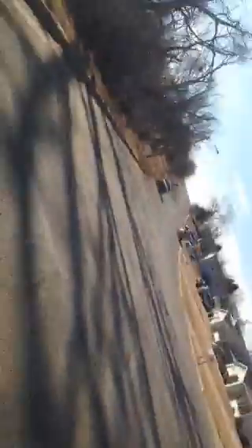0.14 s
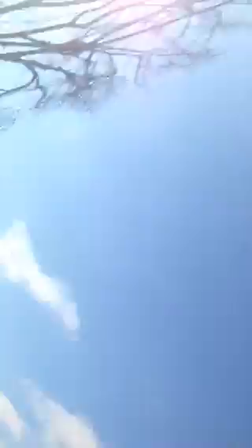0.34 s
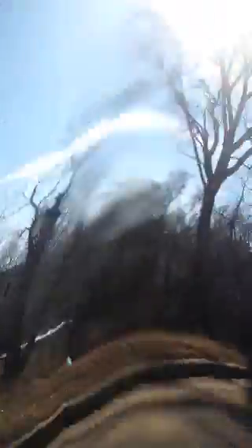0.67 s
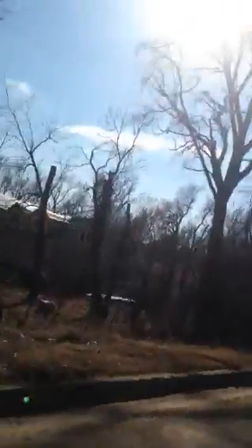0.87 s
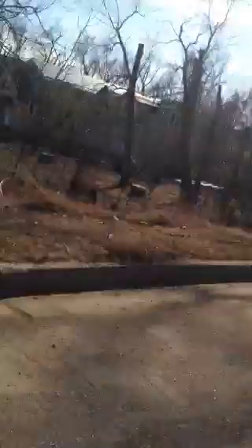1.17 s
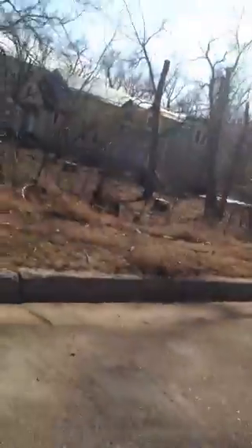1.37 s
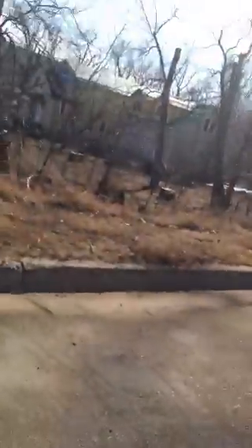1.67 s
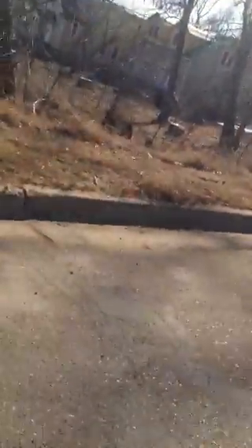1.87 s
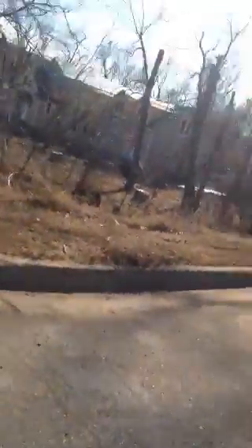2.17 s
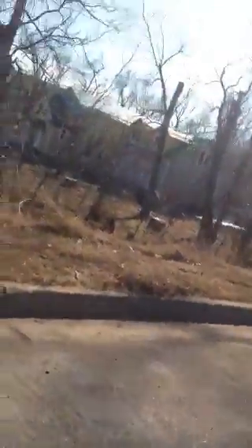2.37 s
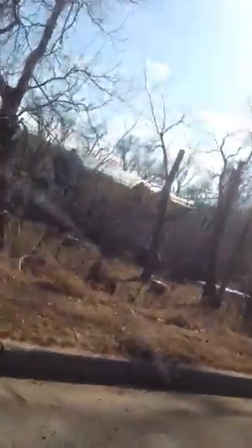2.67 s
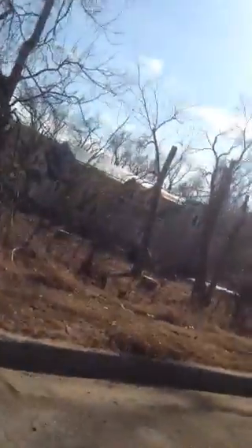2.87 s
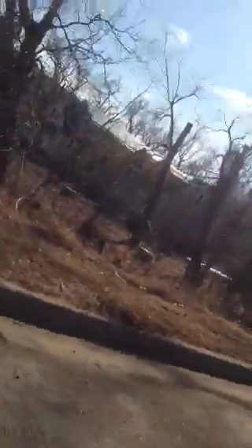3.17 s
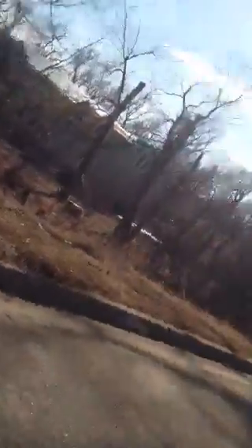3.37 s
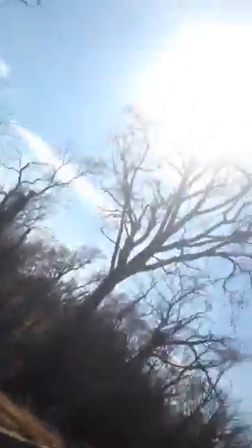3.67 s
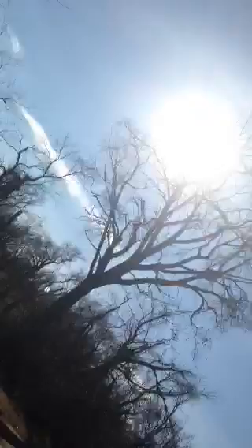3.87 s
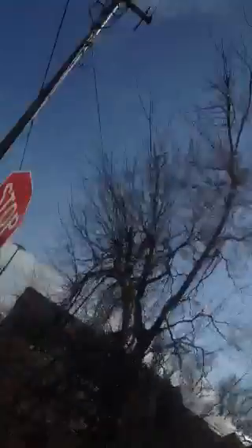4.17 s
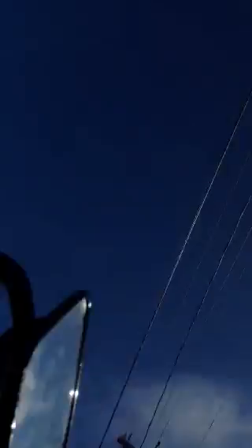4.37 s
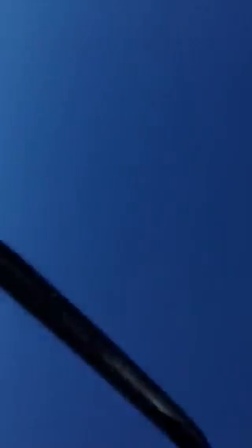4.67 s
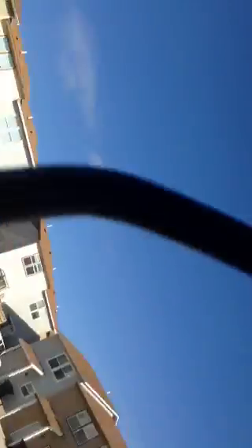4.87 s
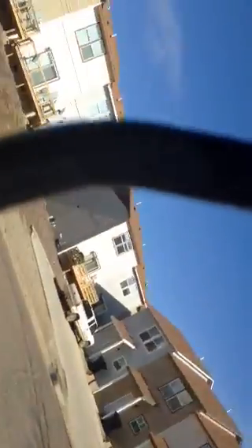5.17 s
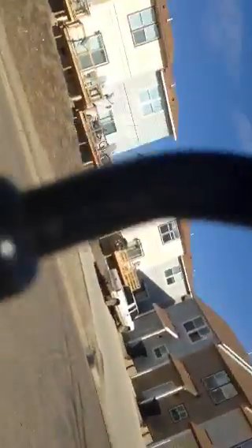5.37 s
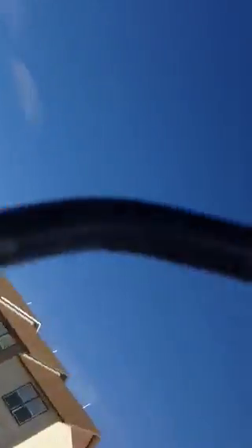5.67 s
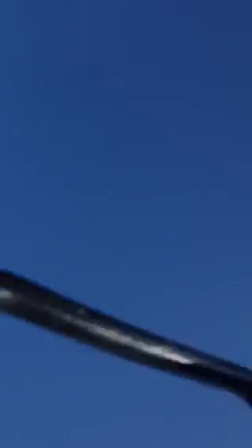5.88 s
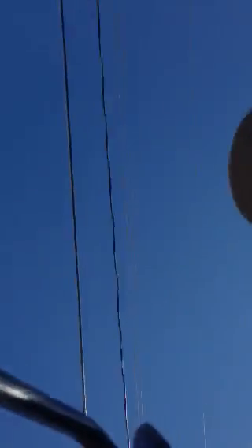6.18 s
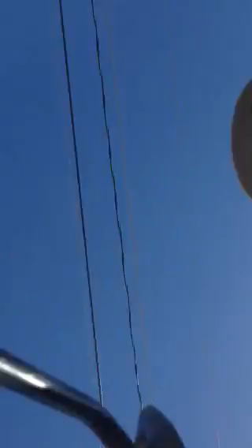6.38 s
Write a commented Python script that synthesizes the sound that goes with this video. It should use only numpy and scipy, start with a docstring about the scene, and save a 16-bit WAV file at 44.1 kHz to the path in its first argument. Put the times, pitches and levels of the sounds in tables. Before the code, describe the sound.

Close on a small motorbike outdoors, rough rubs, a short groan, thin squeaks and dull thumps come first, with low wind fading to a lull. At two seconds the single-cylinder engine catches unevenly, then climbs into a rattling, steady putter with faint chirps. Near the end a gear clanks in, the speed sags, a chain scrapes, and the engine recovers.

```python
"""Rubs, a groan and dry squeaks come first: a rider shifts about on a small single-cylinder motorbike.
Noise bursts make the rubs and clacks, wavering tones the squeaks, and damped modes the frame thumps.
Then the engine starts and runs up: each cycle rings silencer, air box and panels and shapes noise into clatter.
A loose part chirps with the engine, a gear clanks in, the speed sags and recovers, and the chain scrapes.
Filtered noise lays a quiet street underneath, with wind that dies before the start and then returns."""
import sys
import numpy as np
from scipy import signal
from scipy.fft import rfft, irfft
from scipy.io import wavfile

SR = 44100
rng = np.random.default_rng(int(sys.argv[2]) if len(sys.argv) > 2 else 0)


def wav_out(sig):
    """Save sig, one row per channel (or a flat mono array), as 16-bit PCM at SR to the path in sys.argv[1]."""
    wavfile.write(sys.argv[1], SR, np.round(np.clip(np.atleast_2d(sig).T, -1, 1) * 32767).astype(np.int16))


N = 288414
TIME = np.arange(N) / SR  # [s]

# Spectra are filter curves; levels called relative are scaled again where they are used.
# street: (frequency [Hz], relative level [dB])
STREET_TONE = [(15, -58), (25, -1), (55, -3.5), (173, 6.5), (289, -12.5), (631, -14.5), (919, -16),
               (1050, -17), (2700, -21), (5880, -24.5), (7500, -26.5), (14300, -28), (15500, -27)]
STREET_DB = -57
# wind on the microphone: (time [s], level [dB]); its spectrum: (frequency [Hz], relative level [dB])
GUSTS = [(0, -39), (1.9, -101), (2.3, -37), (3.6, -39), (4.5, -43.5), (5.3, -33.5), (6.54, -60)]
WIND_TONE = [(15, -22), (35, -9), (65, -1), (130, 0), (190, -6), (280, -15), (600, -30), (3000, -66)]

# rubs and shoves of hand, boot and kick lever:
# (time [s], rise [s], t60 [s], relative level [dB], brightness [dB per octave])
RUBS = [(0.026, 0.024, 0.12, -4, -0.7), (0.069, 0.002, 0.74, -12, -3.5), (0.099, 0.013, 0.14, -7, 1.5),
        (0.194, .006, 0.16, -15, -0.5), (0.301, 0.011, 0.57, -27.5, -8), (0.378, 0.0051, 0.24, -25, -0.4),
        (.576, 0.0028, 0.34, -26, -1.5), (0.694, 0.026, 0.31, -17.5, -3.5), (0.907, 0.034, 0.13, -29, -2.7),
        (1.919, 0.0057, 0.62, -26, -5.5), (2.005, 0.0057, 0.089, -7, -0.3),
        (2.038, 0.0019, 0.24, -17.5, -3.6), (2.094, 0.015, 0.065, -19.5, 3), (2.136, 0.0046, 0.18, -16, 1),
        (4.044, 0.0088, 0.09, -10, -2.9), (5.646, 0.015, 1, -17.5, -0.5), (5.762, 0.015, 0.056, -17.5, 1.5)]
# their spectrum: (frequency [Hz], relative level [dB])
RUB_TONE = [(20, 0), (55, -3.5), (100, 2.5), (250, 4), (500, -2), (1900, -5.5), (5300, -10), (11500, -25),
            (16000, -39)]
# faint fidgeting before the engine starts: (time [s], relative level [dB])
FIDGET = [(.95, -56), (1.85, -65)]
# sharp clacks of levers and fittings:
# (time [s], t60 [s], relative level [dB], brightness [dB per octave])
CLACKS = [(.598, 0.034, -38.5, 1.7), (.686, 0.039, -25, -3), (.772, .075, -24.5, 2.5),
          (0.84, 0.34, -41, -2.5), (0.982, 0.012, -30, -5.5), (5.022, .05, -17.5, -2.5),
          (5.042, 0.043, -27.5, 1.5), (5.668, 0.013, -20, -1)]
# their spectrum: (frequency [Hz], relative level [dB])
CLACK_TONE = [(20, -34.5), (100, 3.5), (650, -4.5), (1900, -3), (5300, -0.5), (11500, -3.5), (16000, -31)]
# bodywork resonances that colour the bumps: (frequency [Hz], width [Hz], level over the direct sound [dB])
BODYWORK = [(343, 64, -5), (545, 21, 1), (1110, 62, -1.5), (1730, 140, -3.5), (2860, 55, -7)]
# dull thumps through the frame: (time [s], level [dB])
THUMPS = [(0.698, -26.5), (0.712, -23.5), (.762, -28), (4.068, -27.5), (5.018, -57)]
# frame modes they ring: (frequency [Hz], relative level [dB], t60 [s])
FRAME = [(63.6, -39, 0.12), (90.5, 1, 0.18), (127, 12.5, 0.069), (153, -20, 0.048)]

# a hand sticks and slips on the bodywork: (time [s], length [s], mean pitch [Hz], level [dB])
GROANS = [(0.057, 0.044, 577, -20), (0.292, 0.076, 425, -30.5)]
# the loose part squeaks when jolted: (time [s], length [s], mean pitch [Hz], level [dB])
SQUEAKS = [(0.103, 0.062, 2850, -33.5), (0.212, 0.016, 2804, -33.5), (0.314, 0.013, 2890, -43),
           (0.329, 0.064, 2920, -46.5), (0.507, 0.056, 2950, -52.5), (0.632, .04, 2930, -46),
           (0.896, 0.086, 2840, -59.5), (1.08, 0.05, 2930, -65), (1.226, 0.036, 2930, -61.5),
           (1.275, 0.056, 2980, -60.5), (1.591, .07, 2950, -64), (1.919, 0.036, 2920, -49.5),
           (2.107, 0.027, 2590, -38), (2.577, 0.02, 2890, -41)]
# hard taps on the microphone case: (time [s], level before the filter [dB])
TAPS = [(0.1824, 5), (0.7603, 10.5), (5.0218, 17)]
# their spectrum: (frequency [Hz], level [dB])
TAP_TONE = [(20, -20), (150, 3), (450, 5.5), (800, -0.5), (1300, -21), (2200, -30.5), (5000, -23.5),
            (15000, -23)]

# engine speed: (time [s], rate [firings per second])
SPEED = [(2.08, 29.85), (2.14, 17.71), (2.26, 24.86), (2.54, 24.05), (3.14, 31.3), (3.6, 32.25),
         (3.9, 33.47), (4.55, 35.07), (5.4, 34.18), (5.61, 34.82), (5.78, 25.22), (6.05, 18.89),
         (6.28, 31.07), (6.54, 32.74)]
CRUISE_PER_S = 32
# how hard the engine is fed: (time [s], level [dB])
THROTTLE = [(2.08, -8), (2.2, 3), (2.5, -1), (2.7, -1), (2.85, 3), (3.0, 1), (3.35, 1), (3.55, -0.5),
            (4.3, 0.5), (4.87, 1), (5.03, -0.5), (5.4, -1.5), (5.6, 0), (5.97, -4), (6.08, 1), (6.3, -1),
            (6.54, 1)]
# exhaust beat, heavy while the engine labours, light once it spins freely: (time [s], relative level [dB])
LOAD = [(2.08, -22), (2.5, -21), (3.0, -21.5), (3.15, -29.5), (3.55, -25), (4.0, -26), (4.5, -31),
        (5.1, -38), (5.55, -29.5), (5.95, -24.5), (6.54, -21)]
# the hand carries the microphone from air box towards cylinder head: (time [s], nearness to the head [dB])
NEARNESS = [(2.08, -6), (3.2, -.5), (4.1, 0.5), (4.6, 2.5), (6.54, 4.5)]
# how each part answers: (level at cruising speed [dB], throttle [dB per dB],
# speed [dB per extra firing a second], nearness [dB per dB])
INTAKE_LAW = (-30, 0.64, 0.2, -1.04)
CLATTER_LAW = (-42.5, 1.63, -0.07, -0.02)
FINS_LAW = (-58.5, 6.5, 0.28, 3)
VALVES_LAW = (-54.5, 2.23, 0.7, .5)
# the engine fires unevenly at first, then settles to a share of that spread
SETTLE_START_S, SETTLE_END_S, SETTLED_SHARE = 3.0, 4.2, 0.45
ADVANCE_TURNS_PER_HZ = 0.027  # the spark comes earlier in the cycle as the engine speeds up

# modes of silencer and air box: (frequency [Hz], relative level [dB], t60 [s])
SILENCER = [(80, -12, .06), (135, 0, .036), (235, -11, .03)]
AIR_BOX = [(189.7, 10, 0.079)]
# firings that knock harder than the rest: (time [s], extra level [dB])
KNOCKS = [(2.16, 16.5), (2.207, 5.5), (2.251, 7.5), (2.455, 9.5), (2.54, 13.5), (2.699, 10), (3.015, 5.5),
          (3.21, 7.5), (3.274, 6.5), (3.337, 6.5), (3.37, 11), (6.282, 14.5), (6.438, 9.5)]
# resonances of crankcase and cylinder: (frequency [Hz], width [Hz], relative level [dB])
CASE = [(492, 52, 5.5), (1055, 45, 2.5), (1530, 296, 2), (1955, 146, 6), (2280, 100, 5.5), (2830, 220, -33),
        (4780, 60, -8)]
# broad mechanical clatter: (frequency [Hz], relative level [dB])
CLATTER_TONE = [(150, -18), (330, 4), (520, 10.5), (850, 5.5), (1600, 4.5), (2500, -11), (3500, -21.5),
                (5000, -13), (7000, -16), (15000, -42)]
# panel modes that hum with each firing: (frequency [Hz], relative level [dB], t60 [s])
PANELS = [(313.5, -9.5, 0.36), (466, -3.5, 0.25), (550, -14, 0.1), (619.4, 0.5, 0.12), (1071, -27, 0.15),
          (1590, -22, 0.034)]
# valve gear: (frequency [Hz], relative level [dB])
VALVE_TONE = [(1000, 6.5), (3000, 6), (5000, 3.5), (7500, -1.5), (10000, -5.5), (15000, -16)]
# how hard the engine shakes the loose part: (time [s], relative level [dB])
SHAKE = [(2.9, -67), (3.15, -48), (3.7, -45), (4.0, -51.5), (4.4, -49.5), (4.95, -51), (5.35, -68)]

# the gear going in
GEAR_S, GEAR_DB = 5.713, -25
# gearbox modes it rings: (frequency [Hz], relative level [dB], t60 [s])
GEARBOX = [(1047, -4, .09), (1100, -1, .09), (1891, 2, .09), (2396, 0, .09), (3730, -6, .08),
           (4472, -2, .09), (4766, -3, .08), (6528, -9, .08)]
# slam of the gear dogs: (frequency [Hz], level [dB])
SLAM_TONE = [(20, -23), (100, -18), (500, -14), (1900, -6.5), (5300, -9.5), (11500, -19.5), (16000, -23)]
# the drive chain scrapes as it takes up its slack
CHAIN_S, CHAIN_DB = 5.913, -20
# its spectrum: (frequency [Hz], relative level [dB])
CHAIN_TONE = [(20, -25), (500, -10), (1500, -6.5), (2300, -4.5), (3200, -6.5), (5300, -15), (11500, -33.5),
              (16000, -42)]


def amp(db):
    """Decibels to gain."""
    return 10 ** (np.asarray(db) / 20)


def evened(x):
    """Scales to rms 1."""
    return x / np.sqrt(np.mean(x ** 2) + 1e-20)


def level(rows):
    """Gain over time from a dB curve, with short fades to silence outside it."""
    s, db = np.transpose(rows)
    edge = np.interp(TIME, [s[0] - 0.02, s[0], s[-1], s[-1] + 0.05], [0, 1, 1, 0])
    return edge * amp(np.interp(TIME, s, db))


def colour(x, points):
    """Causal minimum-phase filter with the given spectrum."""
    size = 4096
    hz, db = np.transpose(points)
    grid_hz = abs(np.fft.fftfreq(size, 1 / SR)) + 1
    log_gain = np.log(amp(np.interp(np.log(grid_hz), np.log(hz), db)))
    minimum_phase = np.exp(np.conj(signal.hilbert(log_gain)))
    impulse = np.fft.ifft(minimum_phase).real[:size // 2]
    return signal.oaconvolve(x, impulse)[:len(x)]


def tilted(tone, db_per_octave):
    """A spectrum made brighter or duller about 1 kHz; the bass moves as one."""
    return [(hz, db + db_per_octave * np.log2(max(hz, 350) / 1000)) for hz, db in tone]


def drift(per_s):
    """Smoothed noise of rms 1, changing up to about per_s times a second."""
    lowpass = 1 / (1 + (np.fft.rfftfreq(N, 1 / SR) / per_s) ** 4)
    return evened(irfft(rfft(rng.standard_normal(N)) * lowpass, N))


def add(mix, s, sound):
    """Mixes a sound in at time s."""
    part = mix[max(round(s * SR), 0):][:len(sound)]
    part += sound[:len(part)]


def ring(modes):
    """Response of damped modes to one blow, kept for a third of a second."""
    t = np.arange(SR // 3) / SR
    return sum(amp(db - 60 * t / t60) * np.sin(2 * np.pi * hz * t) for hz, db, t60 in modes)


def resonate(x, hz, width):
    """A resonance of gain 1 at its peak."""
    return signal.lfilter(*signal.iirpeak(hz, hz / width, SR), x)


def burst(rise, t60):
    """Envelope that swells to 1 and dies away, kept for a third of a second."""
    t = np.arange(SR // 3) / SR
    return np.minimum(t / rise, 1) ** 2 * amp(-60 * np.maximum(t - rise, 0) / t60)


def slip_noise(spread_db, per_s):
    """Friction noise of rms 1 whose level wavers at random."""
    return evened(rng.standard_normal(N) * amp(spread_db * drift(per_s)))


def scuff(slips, s, rise, t60, tone):
    """A clump of tiny slips that swells and dies away."""
    shape = burst(rise, t60)
    return colour(shape * slips[int(s * SR):][:len(shape)], tone)


def squeal(hz, overtone_db, fall_db):
    """Surfaces sticking and slipping: a tone with four overtones, each fall_db below the last."""
    phase = 2 * np.pi * np.cumsum(hz) / SR
    overtones = sum(amp(overtone_db - fall_db * k) * np.sin((k + 2) * phase) for k in range(4))
    return np.sqrt(2) * (np.sin(phase) + overtones)


def single_squeals(rows, waver, overtone_db, fall_db):
    """Separate stick-slip tones that swell and fade on a wavering pitch."""
    out = np.zeros(N)
    for s, length, pitch_hz, db in rows:
        swell = np.hanning(int(length * SR))
        hz = pitch_hz * waver[int(s * SR):][:len(swell)]
        add(out, s, amp(db) * swell * squeal(hz, overtone_db, fall_db))
    return out


def engine_rate():
    """Firings per second over time, held at the first value before the start."""
    return np.interp(TIME, *np.transpose(SPEED))


def response(law):
    """Gain over time of one engine part, from throttle, speed and the place of the microphone."""
    db, by_throttle, by_speed, by_nearness = law
    speed_db = by_speed * (engine_rate() - CRUISE_PER_S)
    nearness_db = by_nearness * np.interp(TIME, *np.transpose(NEARNESS))
    return amp(db + speed_db + nearness_db) * level(THROTTLE) ** abs(by_throttle)


def strokes(turn, spread_db, jitter):
    """One click per engine cycle, `turn` cycles from its mark, uneven in size [dB] and time [s]."""
    rate = np.interp(TIME, *np.transpose(SPEED), left=0)
    cycles = np.cumsum(rate) / SR
    at = np.flatnonzero(np.diff(np.floor(cycles - turn)) > 0)
    uneven = np.interp(TIME[at], [SETTLE_START_S, SETTLE_END_S], [1, SETTLED_SHARE])
    size, late = uneven * rng.standard_normal((256, 2))[:len(at)].T
    clicks = np.zeros(N)
    clicks[np.clip(at + (late * jitter * SR).astype(int), 0, N - 1)] = amp(spread_db * size)
    return clicks


def repeat(clicks, shape):
    """Plays a shape on every click; rms 1 while the engine runs."""
    x = signal.oaconvolve(clicks, shape)[:N]
    return x / np.sqrt(np.mean(x[TIME > SPEED[0][0]] ** 2))


def puff(clicks, modes, soft_hz, lowest_hz):
    """Rounded pressure pulses ring a gas-filled chamber; its small opening radiates no deep bass."""
    rounded = signal.lfilter(*signal.butter(2, soft_hz, fs=SR), ring(modes))
    opening = signal.butter(3, lowest_hz, "high", fs=SR, output="sos")
    return -repeat(clicks, signal.sosfilt(opening, rounded))


def air():
    """A quiet street and lumpy wind on the microphone, both slowly wavering filtered noise."""
    street = evened(colour(rng.standard_normal(N), STREET_TONE)) * amp(2.0 * drift(15))
    gusts = level(GUSTS) * amp(3.5 * drift(14))
    return amp(STREET_DB) * street + gusts * evened(colour(rng.standard_normal(N), WIND_TONE))


def bumps():
    """Rubs, clacks and fidgeting sound through the bodywork; thumps ring the frame."""
    slips = slip_noise(spread_db=3.94, per_s=640)
    out = level(FIDGET) * amp(5.3 * drift(12)) * colour(slips, tilted(RUB_TONE, db_per_octave=-7.0))
    for s, rise, t60, db, bright in RUBS:
        add(out, s, amp(db) * scuff(slips, s, rise, t60, tilted(RUB_TONE, bright)))
    for s, t60, db, bright in CLACKS:
        add(out, s, amp(db) * scuff(slips, s, 0.0026, t60, tilted(CLACK_TONE, bright)))
    bodywork = sum(amp(db) * resonate(out, hz, width) for hz, width, db in BODYWORK)
    out = amp(-3.5) * (out + bodywork)
    thump = -signal.lfilter(*signal.butter(1, 400, fs=SR), ring(FRAME))
    for s, db in THUMPS:
        add(out, s, amp(db) * thump)
    return out


def groans():
    """Rough, low stick-slip tones of a hand on the bodywork."""
    waver = 1 + 0.066 * drift(43) + 0.061 * drift(270)
    return single_squeals(GROANS, waver, overtone_db=-15.5, fall_db=19)


def squeaks():
    """The loose metal part sticks and slips in single squeaks when jolted."""
    waver = 1 + 0.006 * drift(45) + 0.018 * drift(700)
    return single_squeals(SQUEAKS, waver, overtone_db=-1.5, fall_db=11.0)


def taps():
    """Each tap is one blow straight into the microphone."""
    blows = np.zeros(N)
    for s, db in TAPS:
        add(blows, s, amp([db]))
    return colour(blows, TAP_TONE)


def gas_flow():
    """Each cycle the exhaust thumps the silencer; then the piston gulps air through the air box."""
    exhaust_beats = strokes(-0.134, spread_db=2.6, jitter=0.00038)
    exhaust = puff(exhaust_beats, SILENCER, soft_hz=301, lowest_hz=93.3)
    gulps = strokes(0.2575, spread_db=3.5, jitter=0.0001)
    intake = puff(gulps, AIR_BOX, soft_hz=310, lowest_hz=78)
    return amp(-5.5) * level(LOAD) * exhaust + response(INTAKE_LAW) * intake


def crankcase(rattle):
    """Rattle excites the case, where each resonance swells and fades on its own."""
    case = evened(sum(amp(db + 4.2 * drift(22)) * resonate(rattle, hz, width) for hz, width, db in CASE))
    return colour(case, [(150, -42), (310, -0.5), (460, 2.0), (3000, -2), (6000, -4.0), (12000, -47)])


def cooling_fins(blows):
    """Each blow sets the fins shivering: noise bursts through two close resonances."""
    shiver = (0.03 + repeat(blows, burst(rise=0.011, t60=0.04))) * rng.standard_normal(N)
    return evened(resonate(resonate(shiver, 4110, 230), 4150, 770))


def clatter():
    """Combustion rattles the crankcase ahead of each exhaust beat, hums in panels and rings the fins."""
    advance = ADVANCE_TURNS_PER_HZ * (engine_rate() - CRUISE_PER_S)
    blows = strokes(-0.5 - advance, spread_db=0.0, jitter=0.0008)
    blows *= amp(sum(db * (abs(TIME - s) < 0.018) for s, db in KNOCKS))
    surge = 0.65 + repeat(blows, burst(rise=0.006, t60=0.052))
    rattle = surge * rng.standard_normal(N) * amp(drift(600))
    broad = evened(colour(rattle, CLATTER_TONE))
    panels = repeat(strokes(-0.3, spread_db=1.2, jitter=0.00005), ring(PANELS))
    body = amp(-1.5) * crankcase(rattle) + amp(-4.5) * broad + amp(-13.0) * panels
    return response(CLATTER_LAW) * body + response(FINS_LAW) * cooling_fins(blows)


def valves():
    """The valve gear ticks once a cycle over the hiss of its chain, both filtered noise."""
    tick_clicks = strokes(0.25, spread_db=2.5, jitter=0.0004)
    ticks = 0.9 + repeat(tick_clicks, burst(rise=0.0015, t60=0.04))
    return response(VALVES_LAW) * evened(colour(ticks * rng.standard_normal(N), VALVE_TONE))


def loose_part():
    """The loose part chirps by stick-slip once a cycle while the engine shakes it."""
    shake = repeat(strokes(-0.24, spread_db=2.6, jitter=0.0012), np.hanning(int(0.028 * SR)))
    strength = amp(-1.0) * level(SHAKE) * amp(4.6 * drift(190))
    hz = 2965 * (1 + 0.012 * drift(30) + 0.011 * drift(500))
    return strength * shake * squeal(hz, overtone_db=-6, fall_db=7.0)


def gear():
    """The gear dogs grate, slam home and ring the gearbox."""
    out, shape = np.zeros(N), burst(rise=0.0086, t60=0.24)
    grate = shape * rng.standard_normal(len(shape))
    grate /= np.linalg.norm(grate)
    add(out, GEAR_S, amp(GEAR_DB) * signal.oaconvolve(grate, ring(GEARBOX)))
    slips = slip_noise(spread_db=1.1, per_s=670)
    add(out, GEAR_S, scuff(slips, GEAR_S, rise=0.013, t60=0.097, tone=SLAM_TONE))
    return out


def chain():
    """A short, rough scrape of friction noise as the clutch bites."""
    out, slips = np.zeros(N), slip_noise(spread_db=2.3, per_s=220)
    scrape = scuff(slips, CHAIN_S, rise=0.0074, t60=0.32, tone=CHAIN_TONE)
    add(out, CHAIN_S, amp(CHAIN_DB) * scrape)
    return out


def scene():
    """Everything is close to the one microphone, so all layers are summed dry."""
    handling = bumps() + groans() + squeaks() + taps()
    engine = gas_flow() + clatter() + valves() + loose_part()
    return (air() + handling + engine + gear() + chain())[None]


def record(dry):
    """The recorder's band limit: a linear-phase low-pass."""
    lowpass = signal.firwin(511, 15350, window=("kaiser", 9), fs=SR)  # edge in Hz
    return signal.oaconvolve(dry, lowpass[None], "same")


dry = scene()
out = record(dry)
wav_out(out)
```